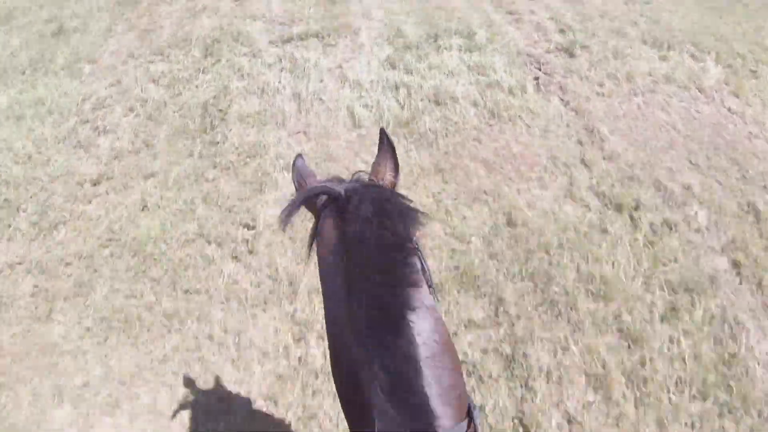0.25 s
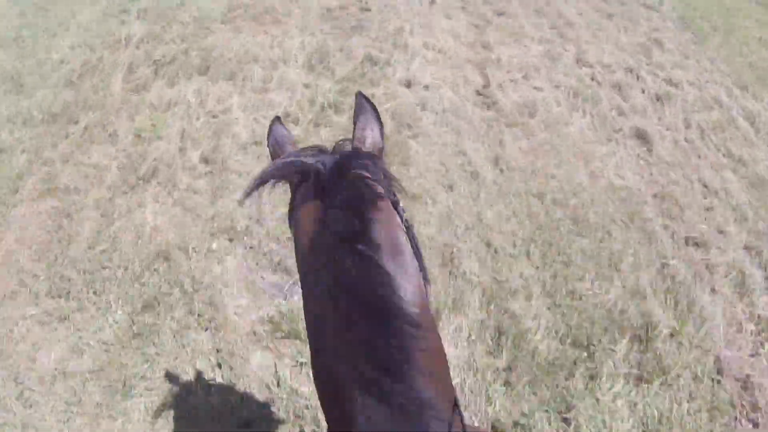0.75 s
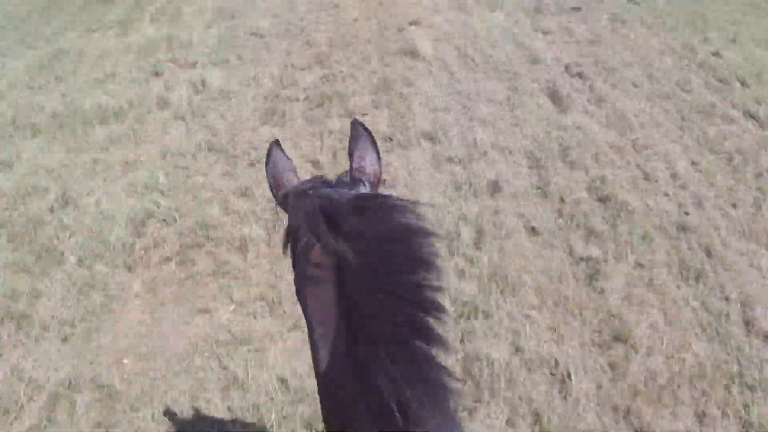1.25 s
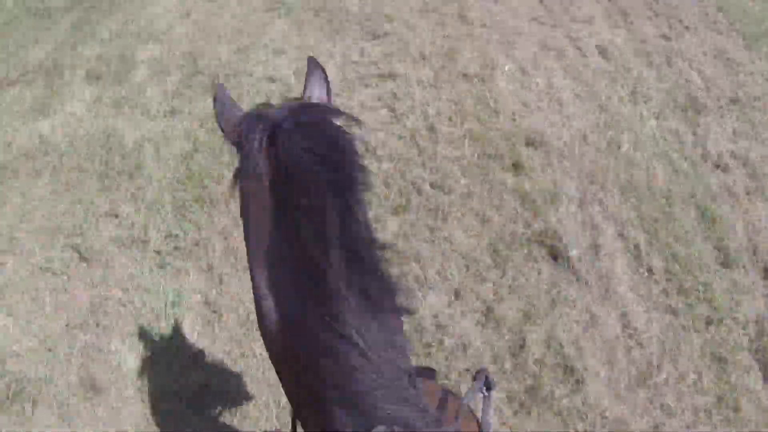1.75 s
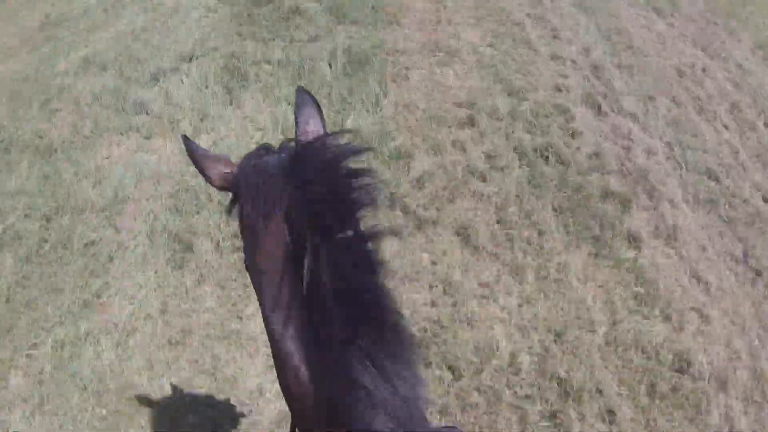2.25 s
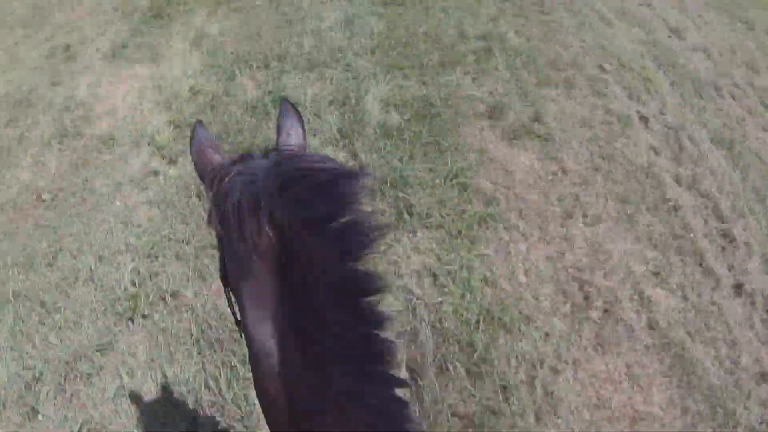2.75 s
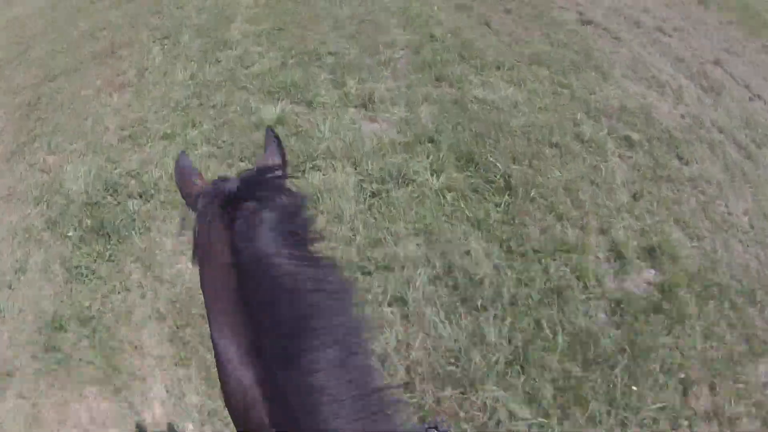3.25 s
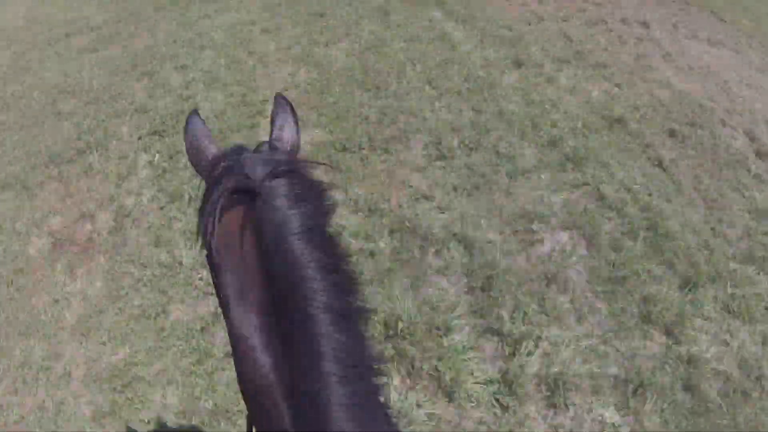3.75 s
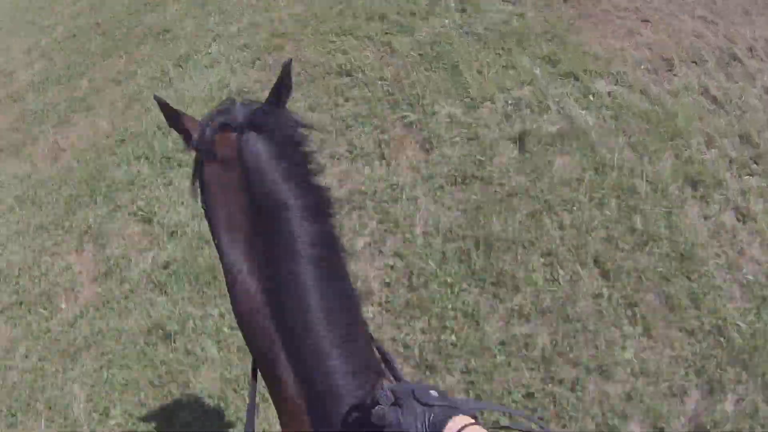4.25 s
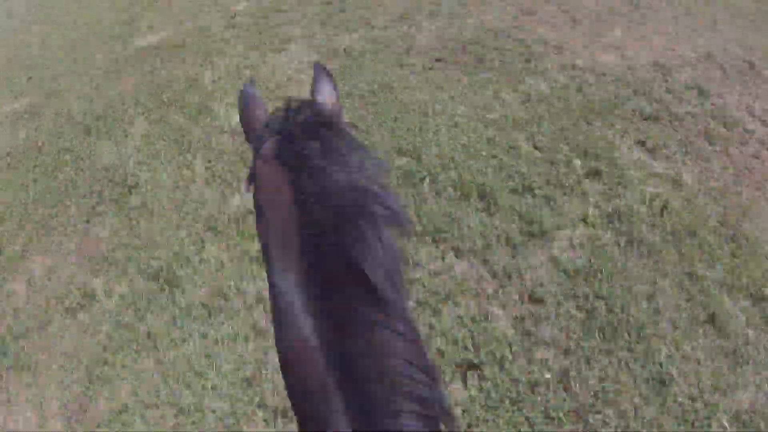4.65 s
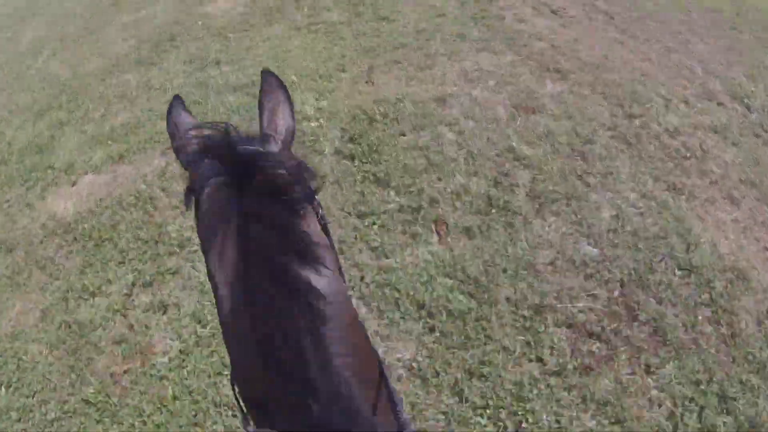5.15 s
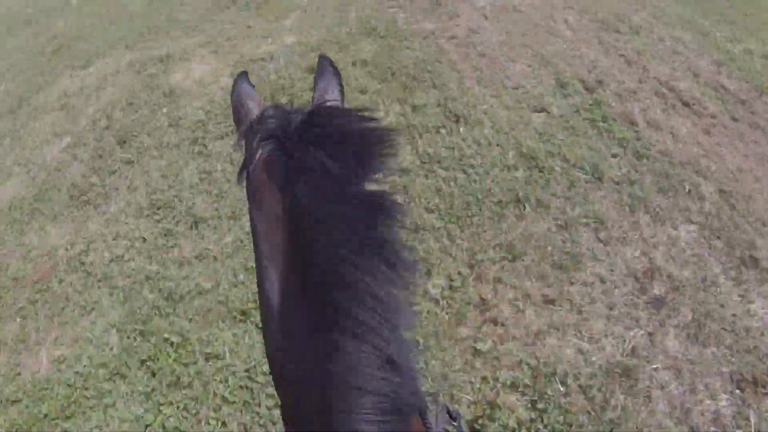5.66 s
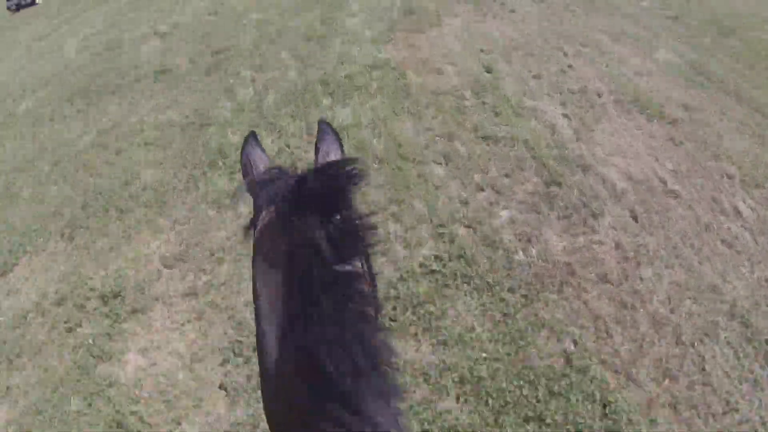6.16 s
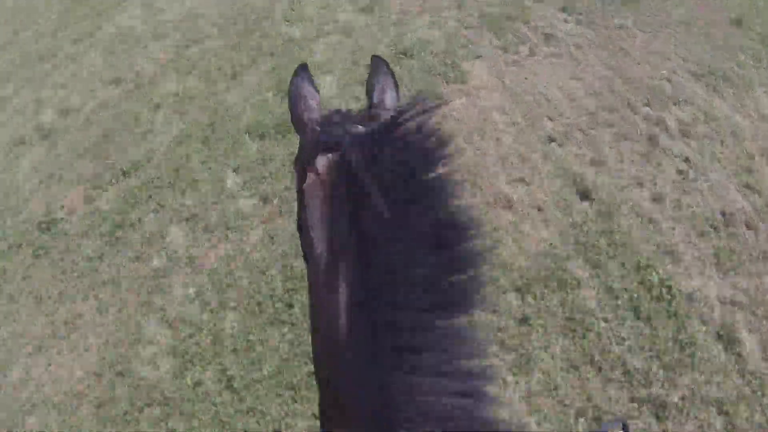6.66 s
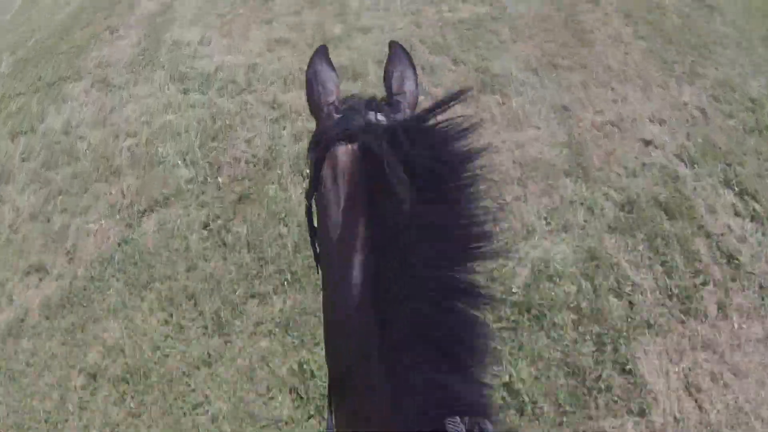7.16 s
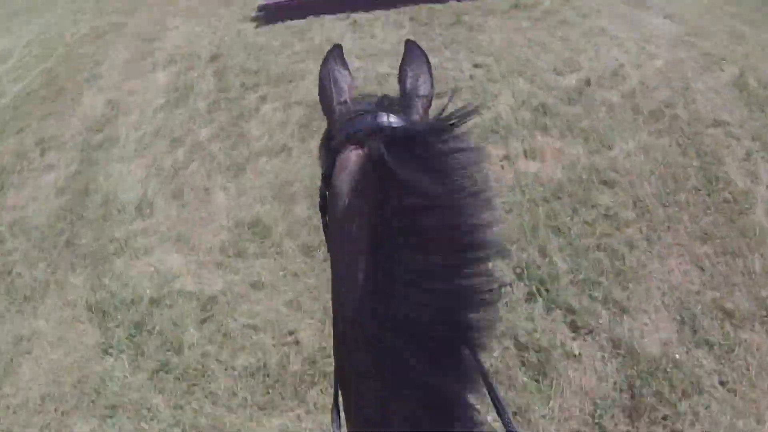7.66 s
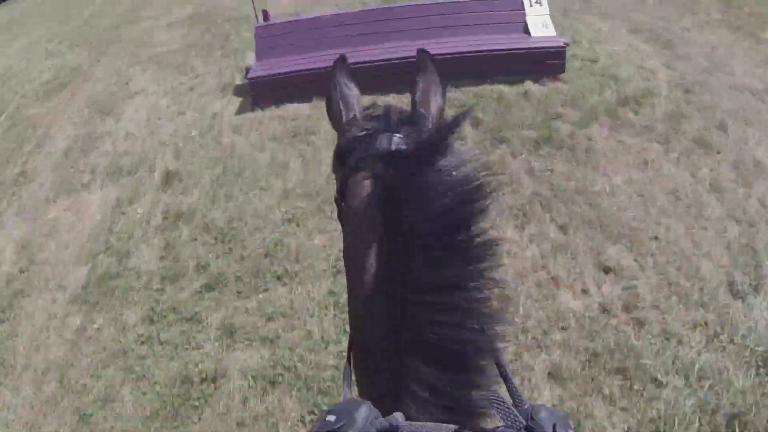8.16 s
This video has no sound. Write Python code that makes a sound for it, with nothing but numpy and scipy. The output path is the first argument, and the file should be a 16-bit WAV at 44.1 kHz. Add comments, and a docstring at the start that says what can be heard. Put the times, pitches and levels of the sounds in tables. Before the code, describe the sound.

Outdoors on grass, a cantering horse is heard from a closed camera case on the rider's helmet, so the strides arrive as jolts through the mount. The first 2.5 seconds are lighter: low wind buffeting, airy rush, a knock and thump near 0.9, and softer bumps around 1.4 and 2.1. From about 2.6 the jolts strengthen, and from 3.1 to 7.0 deep booming thumps land roughly every 0.55 seconds, often overloading, with hard knocks, gritty plastic rattles and tiny ticks; those at 4.2, 4.75, 5.85 and 6.4 are especially rough. Between them the muffled wind flutters and hisses with a faint hollow whistle, ducking after hard hits and creeping back. After 7.0 the thumps weaken; a bright clack comes at 7.67, wind gusts near 8.3, and a sharp knock closes at 8.4.

```python
"""Hard thumps, knocks and rattles of a canter over grass, with wind buffeting and hissing in between.
The microphone is in a closed camera case on the rider's helmet, so hard strides jolt it through the mount.
Low thumps and knocks are decaying sines, rattles are noisy bursts of tiny impacts, ticks are short cracks
with a ring. Wind is coloured noise: buffets, a roar at the port, a rush through the shell, and a whistle.
The camera turns its gain down when the low middle gets loud, holds it, and lets it creep back."""
import sys
import numpy as np
from scipy import signal
from scipy.fft import rfft, irfft, next_fast_len
from scipy.io import wavfile
from scipy.ndimage import uniform_filter1d, minimum_filter1d, map_coordinates

SR = 44100
rng = np.random.default_rng(int(sys.argv[2]) if len(sys.argv) > 2 else 0)


def to_wav(s):
    """Save 16-bit WAV."""
    ch = np.atleast_2d(s).T  # columns
    pcm = np.round(np.clip(ch, -1, 1) * 32767)  # PCM
    wavfile.write(sys.argv[1], SR, pcm.astype(np.int16))


N = 371482  # length in samples


def amp(db):
    """Amplitude ratio of a level in dB."""
    return 10 ** (np.asarray(db) / 20)


def unit(x):
    """The signal scaled to rms 1."""
    return x / np.sqrt(np.mean(x ** 2) + 1e-20)


def wobble(rate_hz):
    """A smooth random curve through rate_hz random knots a second."""
    knots = rng.standard_normal(int(N * rate_hz / SR) + 4)
    return map_coordinates(knots, [np.arange(N) * rate_hz / SR])


def filtered(x, response):
    """The signal with its spectrum multiplied by a response of frequency."""
    size = next_fast_len(N + 8192)
    spectrum = rfft(x, size) * response(np.fft.rfftfreq(size, 1 / SR))
    return irfft(spectrum, size)[:N]


def noise(colour, source=None):
    """White noise, or another source, coloured by (pitch_hz, level_db) points on a log axis, at rms 1."""
    pitch_hz, level_db = np.transpose(colour)
    if source is None:
        source = rng.standard_normal(N)

    def response(hz):
        return amp(np.interp(np.log(hz + 1), np.log(pitch_hz), level_db, left=-120))

    return unit(filtered(source, response))


def swells(events, width_s):
    """Bell-shaped swells of gain at (start_s, level_db, ...) events, centred there; width_s is the bell's sigma."""
    t = np.arange(N) / SR
    return sum(amp(level_db) * np.exp(-.5 * ((t - centre_s) / width_s) ** 2)
               for centre_s, level_db, *_ in events)


def add(track, start_s, sound):
    """Mixes a sound into the track from start_s on."""
    part = track[max(round(start_s * SR), 0):][:len(sound)]
    part += sound[:len(part)]


# Low thumps: hard stride jolts through the mount, and weaker low lumps of wind buffeting.
# start_s (of the drop), level_db, pitch_hz, t60_s
LOW_THUMPS = [(.375, -17, 29, .25), (.411, -24, 38, .25), (.927, -7.5, 36, .18), (1.523, -19, 38, .17),
              (1.98, -14, 30, .28), (2.085, -20, 29, .25), (2.148, -15, 29, .1), (2.207, -19, 38, .09),
              (2.576, -8, 38, .17), (3.11, 1, 33, .165), (3.668, -5, 37, .17), (4.218, 1.5, 42, .085),
              (4.751, 0, 33, .19), (5.337, -1.5, 34.6, .2), (5.858, .8, 32, .21), (6.414, .2, 30, .2),
              (6.972, -5, 33, .15), (7.396, -16, 38, .17), (7.49, -22, 30, .2), (7.557, -21, 30, .2),
              (7.594, -21, 35, .25), (7.699, -15, 38, .2), (7.953, -14, 36, .12), (8.023, -15, 27, .25),
              (8.061, -22, 33, .11), (8.4, -16, 28, .3)]
LANDING_DB = -10  # thumps harder than this are landings
LEAD_S, LEAD_DB, LEAD_HZ, LEAD_T60_S = .064, -17, 21, .25  # slow swing ahead of a landing
POINTED, POINTED_S = .2, .015  # share of third harmonic in the drop, and its decay time


def low_thumps():
    """Each thump winds up briefly, drops hard, then rings at its low pitch and dies ever faster."""
    out = np.zeros(N)
    t = np.arange(-SR // 20, SR // 2) / SR
    leads = [(start_s - LEAD_S, LEAD_DB, LEAD_HZ, LEAD_T60_S)
             for start_s, level_db, *_ in LOW_THUMPS if level_db > LANDING_DB]
    for start_s, level_db, pitch_hz, t60_s in [*LOW_THUMPS, *leads]:
        turn = 2 * np.pi * pitch_hz * t
        # the third harmonic sharpens the first drop
        edge = POINTED * np.exp(-np.abs(t) / POINTED_S) * (t > 0)
        swing = edge * np.sin(3 * turn) - np.sin(turn)
        wind_up = -t / .03
        ring_out = (np.abs(t) / t60_s) ** 1.3
        fall_db = 60 * np.where(t < 0, wind_up, ring_out)
        add(out, start_s + t[0], amp(level_db - fall_db) * swing)
    return out


# Knocks of the case in its mount: start_s, level_db, thud_db and clack_db (lowest and highest mode, added)
CASE_KNOCKS = [(0.8424, -23, -6, 2), (0.9528, -25, -2, -5), (1.3507, -30.5, -12, -6), (2.1317, -25, 4, -2),
               (2.6032, -30.5, 11.5, -2), (2.65, -32, 3, -7), (3.1048, -23, -3, -1), (3.168, -30, -1, -17),
               (3.3398, -28, 7.5, -14), (3.529, -42.5, 10, -16), (3.641, -28.5, 3, -4),
               (3.6934, -26.5, 11.5, -3), (4.1706, -19.5, -10, -19), (4.2082, -10, -2.5, -4),
               (4.2155, -15, 10, -7), (4.697, -32, -1, 3), (4.7363, -23, 9, -21), (4.7404, -20, -5, -7),
               (4.7489, -21, 10.5, 8), (4.774, -26, 15, -11), (5.0214, -38, 15, -7),
               (5.21, -37.5, 13.5, -14), (5.2863, -24.5, -14, -5), (5.3313, -22, -10.5, -3),
               (5.483, -44, 19.5, 1), (5.5601, -26, 3.5, -19), (5.7162, -36.5, 11.5, -5),
               (5.8118, -20, -23, -9), (5.8423, -17, -1, -17), (5.853, -14, 3, -24), (6.2988, -41, 15, -15),
               (6.3607, -20, -10, -16), (6.399, -16.5, -9, -11), (6.407, -21.5, 10, -9),
               (6.411, -24, 18, -20), (6.4311, -18.5, 2, -11), (6.8858, -30, 8, -8),
               (6.97, -33.5, 14.5, -19), (7.164, -43.5, 14, -21), (7.3927, -40, 11.5, -16),
               (7.6439, -38, 9, -17), (7.6737, -23, 4.5, 16.5), (8.2746, -27, 3.5, -20),
               (8.4213, -14.5, -1, 8.5)]
# Modes of the mount, low to high: pitch_hz, level_db, t60_s
MOUNT_MODES = [(97.5, 5.5, 0.036), (233.5, 8, 0.02), (764, 2.5, 0.0056)]


def knocks():
    """Each contact rings the short modes of the mount; the thud and clack shares set its hardness."""
    out = np.zeros(N)
    t = np.arange(SR // 5) / SR
    rise = 1 - np.exp(-t / 0.00095)
    for start_s, level_db, thud_db, clack_db in CASE_KNOCKS:
        for (pitch_hz, mode_db, t60_s), share_db in zip(MOUNT_MODES, (thud_db, 0, clack_db)):
            decay = amp(level_db + mode_db + share_db - 60 * t / t60_s)
            add(out, start_s, decay * np.sin(2 * np.pi * pitch_hz * t) * rise)
    return out


# Rattles of the case: start_s, level_db, t60_s
CASE_RATTLES = [(0.843, -38.5, 0.04), (0.917, -34.5, 0.033), (1.083, -41.5, 0.046), (2.138, -38.5, 0.098),
                (2.508, -42.5, .07), (2.531, -30, 0.028), (2.565, -36, 0.036), (3.036, -39, .045),
                (3.049, -34, 0.041), (3.064, -37.5, 0.042), (3.081, -48, 0.054), (3.107, -27, 0.029),
                (3.612, -42, .07), (3.626, -33.5, 0.054), (3.662, -37, 0.036), (3.693, -47, .035),
                (4.142, -41, 0.074), (4.157, -28.5, 0.052), (4.169, -27, .04), (4.208, -21, 0.04),
                (4.216, -29, 0.048), (4.224, -32, 0.043), (4.237, -39, 0.046), (4.684, -34.5, 0.071),
                (4.696, -30.5, .05), (4.707, -43, 0.025), (4.738, -31, 0.091), (4.748, -30, 0.044),
                (4.773, -34, 0.038), (5.256, -43, 0.08), (5.272, -31, 0.05), (5.288, -38, 0.016),
                (5.313, -31.5, 0.04), (5.332, -25, 0.023), (5.415, -43.5, 0.07), (5.56, -48, .045),
                (5.787, -37.5, 0.076), (5.801, -27, 0.047), (5.81, -36, 0.035), (5.845, -22.5, 0.049),
                (5.853, -27, 0.049), (6.333, -39, 0.07), (6.347, -28.5, 0.047), (6.359, -34, 0.032),
                (6.399, -28, 0.099), (6.412, -27.5, 0.029), (6.429, -34, 0.027), (6.884, -41.5, 0.054),
                (6.967, -40.5, 0.038), (7.655, -43.5, 0.13), (7.673, -24.5, 0.063), (7.686, -36, 0.038),
                (7.722, -36.5, 0.028), (7.82, -44.5, 0.037), (8.276, -41.5, 0.049), (8.327, -36.5, .03),
                (8.417, -38, .043)]
# Resonances of the rattling shell: pitch_hz, level_db
SHELL_COLOUR = [(290, -54), (500, -6.5), (760, -3), (880, -19), (1090, 9), (1500, -3), (1750, 6),
                (2110, -8), (2600, -6), (3300, -23), (3850, -16.5), (4500, -35.5), (6000, -29.5),
                (8000, -52.5), (15000, -72)]
RATTLE_RISE_S = 0.00188
BUILD_DB, BUILD_S = -20, .006  # chatter that creeps up ahead of a rattle: level under it, time constant


def rattles():
    """Bursts of tiny impacts, a firm first one and uneven followers, in the resonances of the shell."""
    envelope = np.zeros(N)
    t = np.arange(SR // 5) / SR
    rise = 1 - np.exp(-t / RATTLE_RISE_S)
    build = np.exp(-t[::-1] / BUILD_S)
    impacts = (rng.random(N) < 600 / SR) * rng.standard_normal(N)  # about 600 a second
    for start_s, level_db, t60_s in CASE_RATTLES:
        peak_s = start_s + RATTLE_RISE_S
        add(envelope, start_s, amp(level_db - 60 * t / t60_s) * rise)
        add(envelope, peak_s - t[-1], amp(level_db + BUILD_DB) * build)
        add(impacts, peak_s, np.array([2.2]))  # the firm first impact
    grit = noise(SHELL_COLOUR, impacts) + amp(3.0) * noise(SHELL_COLOUR)
    return envelope * unit(grit)


# Short bright ticks and clicks, some of them the recorder's gain stepping or clipping just after hard jolts:
# start_s, level_db, pitch_hz
BRIGHT_TICKS = [(0.917, -58, 4570), (1.0859, -54, 5360), (1.775, -55, 6690), (2.0088, -55, 4720),
                (2.3256, -50.5, 6560), (2.8803, -56, 6830), (3.34, -53, 5340), (3.5316, -47, 5700),
                (3.661, -54, 5500), (3.9375, -54, 6560), (4.223, -31.5, 4530), (4.7381, -59, 4960),
                (4.757, -37.5, 4520), (4.7644, -49.5, 4890), (4.7744, -51, 4500), (4.7844, -50, 4620),
                (5.3333, -50, 5080), (5.8643, -45, 4500), (5.8724, -45.5, 4980), (6.4202, -47, 4760),
                (6.4274, -54, 4660), (7.674, -42.5, 5300), (7.8221, -51, 6600), (8.297, -47, 6630),
                (8.3335, -52, 6680)]


def ticks():
    """A very short wide crack with a brief ring; faint ones come at random."""
    out = np.zeros(N)
    t = np.arange(SR // 50) / SR
    chance = rng.random((40, 3))
    faint = np.transpose([chance[:, 0] * N / SR, -62 + 6 * chance[:, 1], 4000 + 9000 * chance[:, 2]])
    for start_s, level_db, pitch_hz in [*BRIGHT_TICKS, *faint]:
        crack = rng.standard_normal(len(t)) * amp(-2.1 - 60 * t / 0.015)
        ring = amp(3.5 - 60 * t / 0.0077) * np.sin(2 * np.pi * pitch_hz * t)
        add(out, start_s, amp(level_db) * (crack + ring))

    def bright_band(hz):
        return 1 / (1 + (hz / 13000) ** 4) / (1 + (2500 / (hz + 1)) ** 4)

    return filtered(out, bright_band)


# Colour of the buffeting: pitch_hz, level_db
BUFFET_COLOUR = [(10, -18), (22, 14.5), (33, 5.5), (50, 2.5), (90, -10), (150, -60.5)]
BUFFET_DB = 7.5  # buffeting over the wind's roar level


def buffeting(roar_db):
    """Deep air pushes that swell and drop in uneven gusts."""
    gusts_db = 1.14 * wobble(6.5) + 3.2 * wobble(17)
    return amp(roar_db + BUFFET_DB) * unit(amp(gusts_db) * noise(BUFFET_COLOUR))


# Colour of the roar at the port: pitch_hz, level_db
ROAR_COLOUR = [(47, -59), (80, 5.5), (178, -4), (232, -4.5), (274, -6.5), (361, -8.5), (560, -21),
               (730, -86), (1230, -120)]
SHAKE_DB, SHAKE_S = -25.5, 0.026  # roar stirred by a knock: level under the knock's, sigma of its swell


def port_roar(roar_db, lumps):
    """Eddies come in lumps at the port, roaring more as a knock shakes it."""
    stirred = amp(roar_db) + amp(SHAKE_DB) * swells(CASE_KNOCKS, SHAKE_S)
    lumps_db = 2.33 * lumps + 0.63 * wobble(6)
    return stirred * unit(amp(lumps_db) * noise(ROAR_COLOUR))


# Colour of the wind through the shell: pitch_hz, level_db
RUSH_COLOUR = [(330, -53), (560, -8.5), (632, -2.5), (933, -5.5), (1110, 0), (1360, -0.5), (1610, -3),
               (2190, -6), (2550, -8.5), (2840, -18), (3890, -21.5), (5060, -44), (8560, -120)]


def shell_rush(rush_db, lumps):
    """The rush through the shell shares the lumps of the roar but flutters more finely."""
    flutter_db = .7 * lumps + 1.3 * wobble(60) + .7 * wobble(8)
    return amp(rush_db) * unit(amp(flutter_db) * noise(RUSH_COLOUR))


# Whistles of the port between strides, as the head swings into the air: centre_s, level_db
PORT_WHISTLES = [(.35, -78), (.85, -62), (1.15, -59), (1.5, -62), (2.3, -60.5), (2.78, -63), (3.32, -52.5),
                 (3.93, -56.5), (4.42, -50), (5.07, -57), (5.53, -63), (6.15, -52.5), (6.62, -51.5),
                 (7.3, -66), (7.74, -65), (8.32, -60)]
# Air mode of the case: pitch_hz, level_db
WHISTLE_COLOUR = [(700, -68), (1000, -30.5), (1095, -3.5), (1200, -13.5), (1600, -53)]


def whistling():
    """Noise in the narrow air mode of the case swells at each swing of the head."""
    return swells(PORT_WHISTLES, width_s=0.1) * noise(WHISTLE_COLOUR)


# Wind level over time: start_s, roar_db (at the port), rush_db (through the shell)
WIND_LEVELS = [(0, -49, -61), (.2, -42, -53), (.4, -40.5, -50.5), (.9, -41, -51), (1.3, -42.5, -50),
               (1.55, -42.5, -55), (2.05, -46, -56), (2.35, -42, -52), (2.65, -41, -56), (3.05, -42, -51.5),
               (3.7, -42.5, -53), (4, -45.5, -51), (4.6, -40.5, -50), (5.1, -43.5, -56),
               (5.7, -45.5, -56.5), (6.2, -39, -49), (6.75, -40, -50.5), (7.15, -48, -58.5),
               (7.4, -42, -54), (7.55, -45.5, -57.5), (7.75, -41, -54), (8.1, -47.5, -57.5),
               (8.33, -36.5, -50.5), (8.42, -55, -56.5)]


def wind():
    """The wind's changing levels drive buffets, roar and rush; the whistle swells on its own."""
    start_s, *columns = np.transpose(WIND_LEVELS)
    roar_db, rush_db = [np.interp(np.arange(N) / SR, start_s, column) for column in columns]
    lumps = wobble(22)
    return buffeting(roar_db) + port_roar(roar_db, lumps) + shell_rush(rush_db, lumps) + whistling()


def scene():
    """All sources summed into one channel, ahead of hiss and gain control."""
    return (low_thumps() + knocks() + rattles() + ticks() + wind())[None]


def gain_control(x, threshold_db, most_db, release_db_per_s, hold_s, delay_s):
    """Gain drops when the low middle of the sound passes a threshold, holds, then climbs steadily."""
    low_middle = signal.butter(3, [100, 600], "bandpass", fs=SR, output="sos")
    heard_db = 20 * np.log10(np.abs(signal.sosfilt(low_middle, x)) + 1e-9)
    cut_db = np.clip(5 * (heard_db - threshold_db), 0, most_db)
    # the deepest cut of the last hold_s
    hold = int(hold_s * SR)
    held_db = -minimum_filter1d(-cut_db, hold, origin=(hold - 1) // 2)
    climb_db = release_db_per_s * np.arange(N) / SR
    cut_db = np.maximum.accumulate(held_db + climb_db) - climb_db
    late_db = np.pad(cut_db, (int(delay_s * SR), 0))[:N]
    return amp(-uniform_filter1d(late_db, size=900))


# Colour of the microphone hiss: pitch_hz, level_db
HISS_COLOUR = [(1500, -1), (3000, 6.5), (5000, 5.5), (7200, 0), (8100, 4), (9000, -3), (12000, -7.5),
               (15300, -28)]
TOP_HZ = 15300  # nothing passes above this


def record(dry):
    """Microphone hiss, gain control, full-scale clipping and the band limit."""
    x = dry[0] + amp(-68.0) * noise(HISS_COLOUR)
    gain = gain_control(x, threshold_db=-16.5, most_db=9.5, release_db_per_s=27.0, hold_s=0.14, delay_s=0.022)
    clipped = np.clip(x * gain, -1, 1)
    return filtered(clipped, lambda hz: hz < TOP_HZ)[None]


dry = scene()
out = record(dry)
to_wav(out)
```